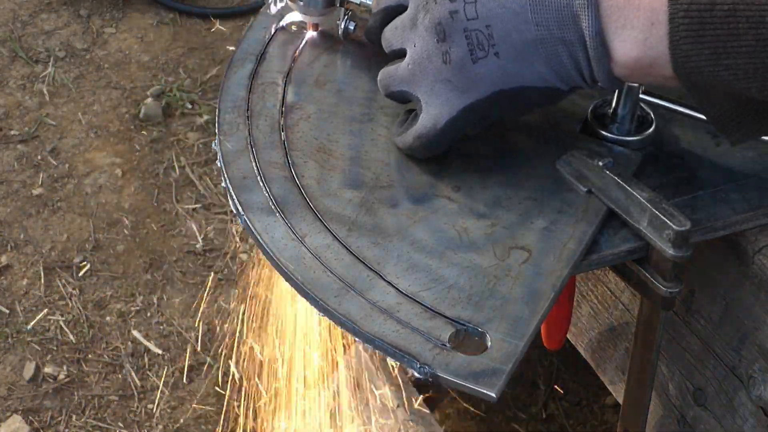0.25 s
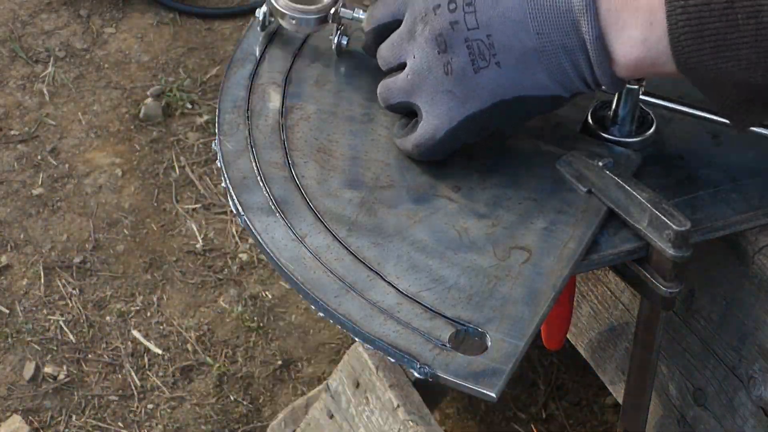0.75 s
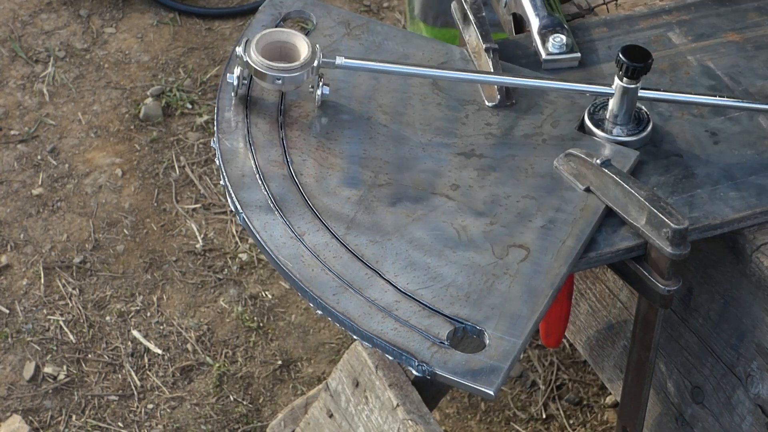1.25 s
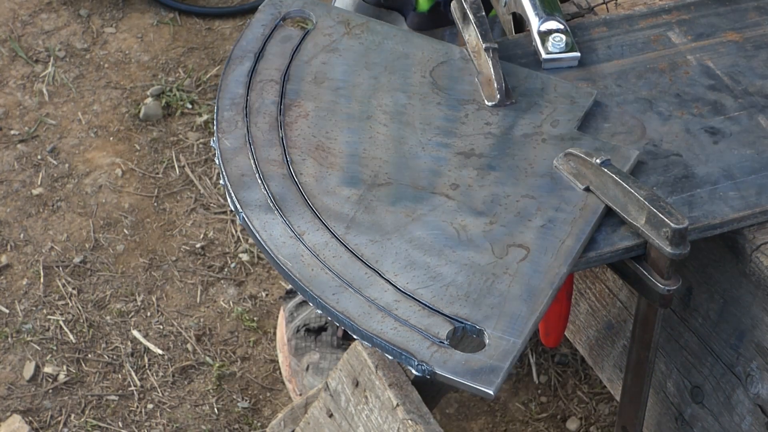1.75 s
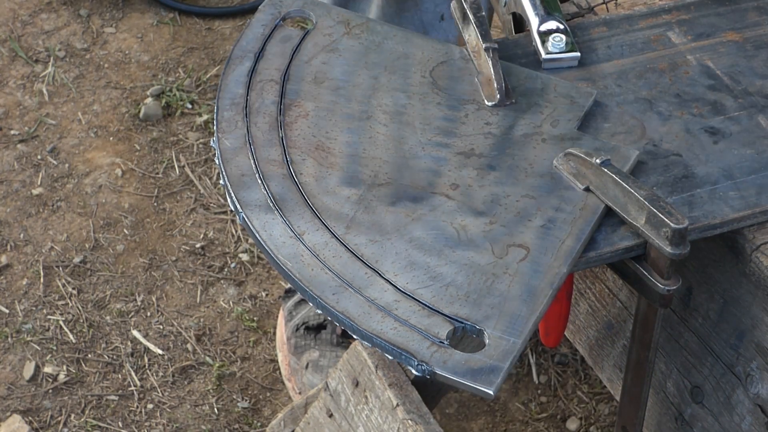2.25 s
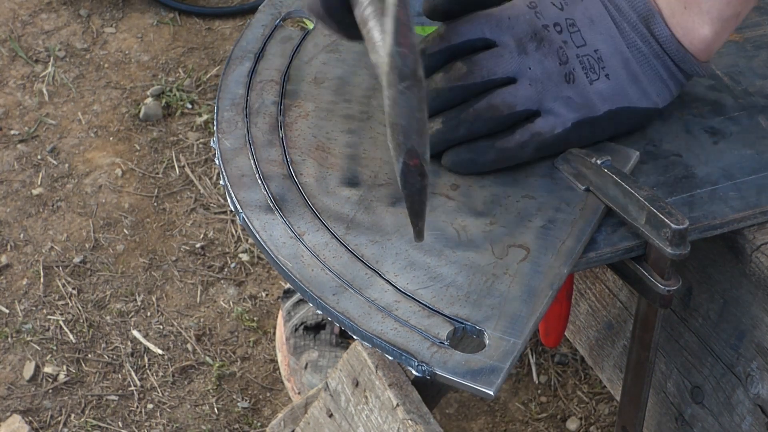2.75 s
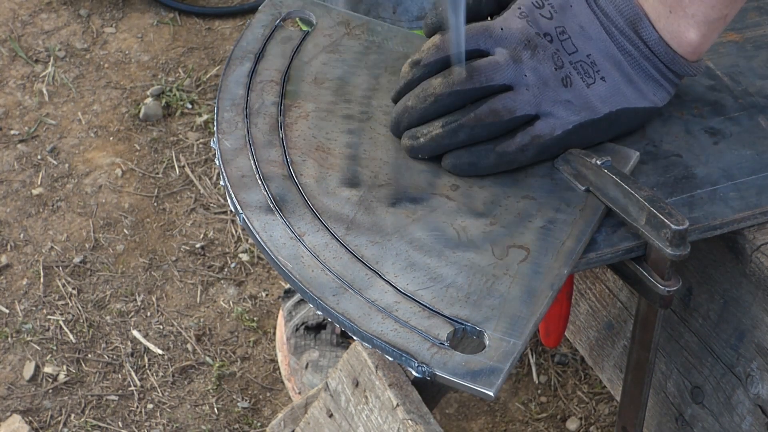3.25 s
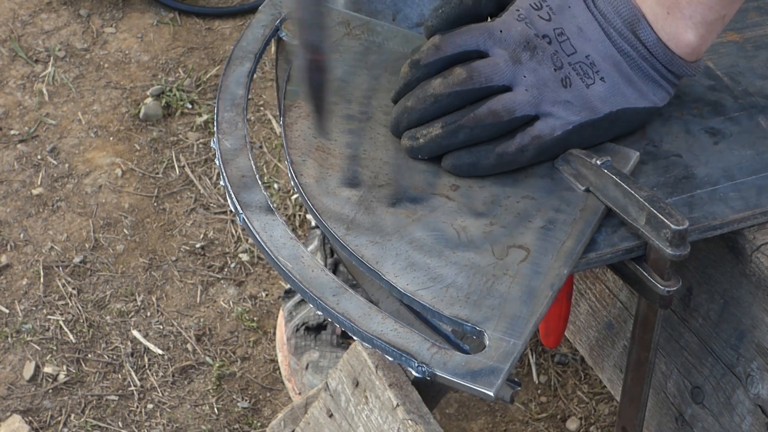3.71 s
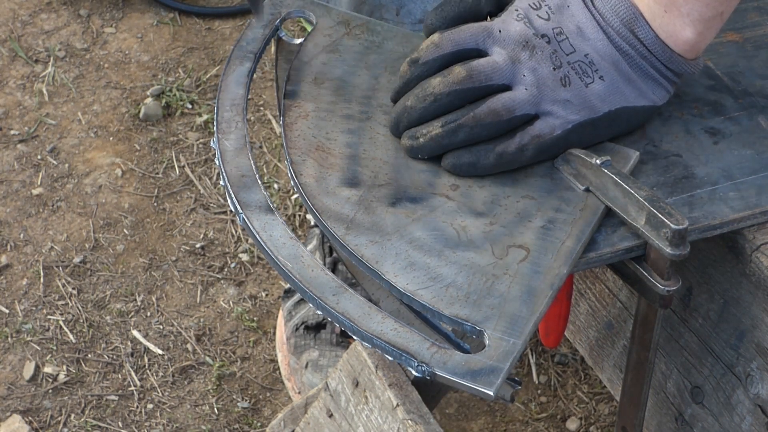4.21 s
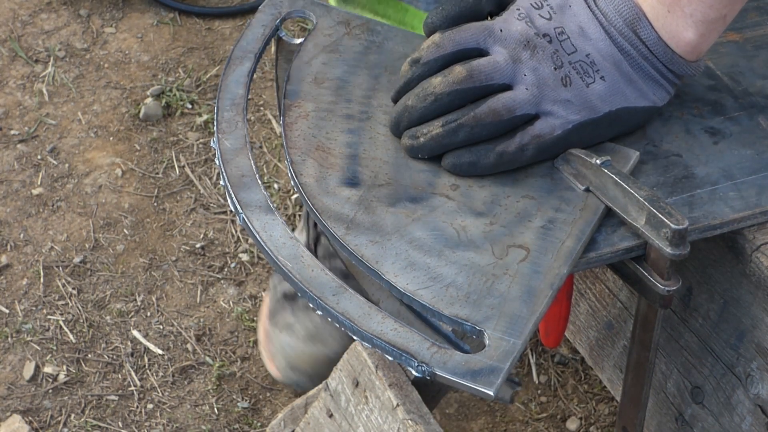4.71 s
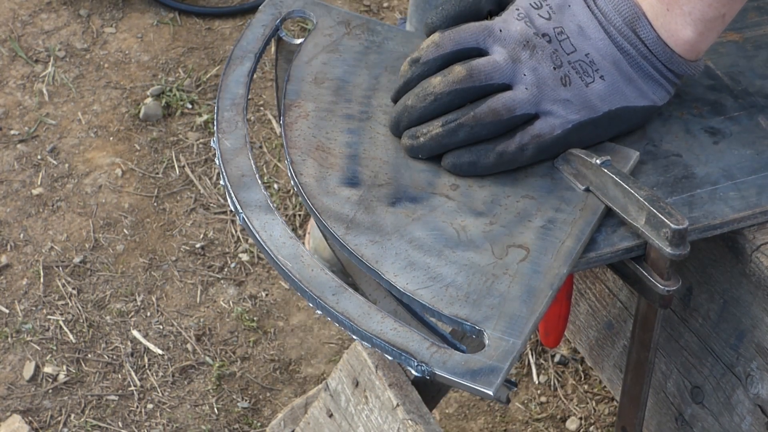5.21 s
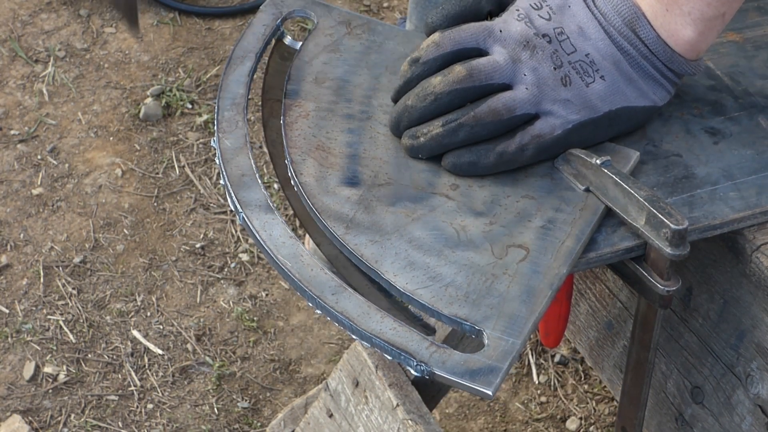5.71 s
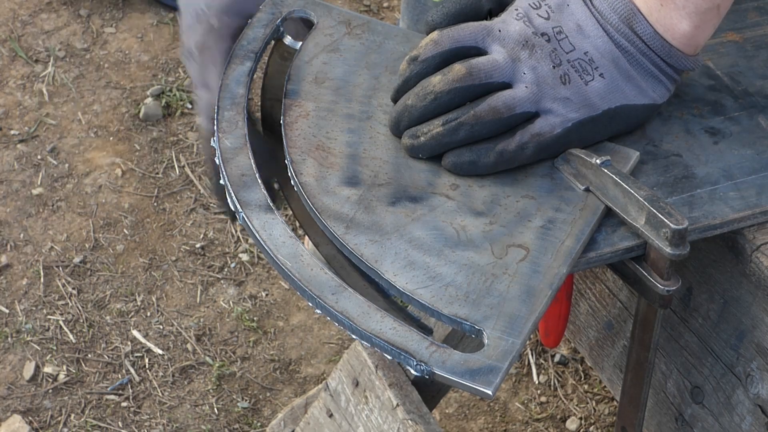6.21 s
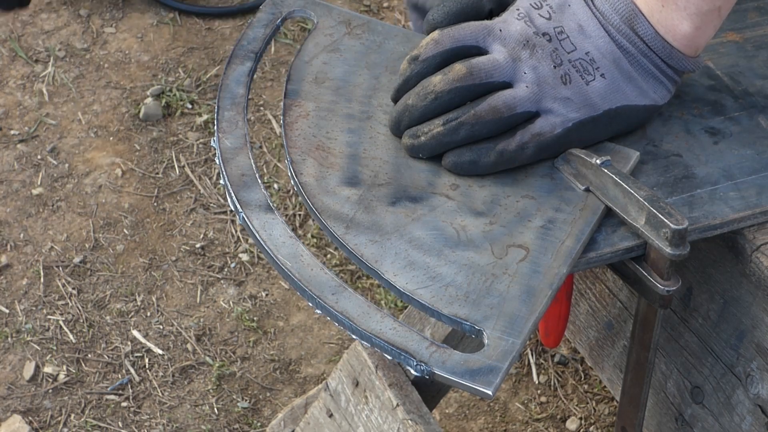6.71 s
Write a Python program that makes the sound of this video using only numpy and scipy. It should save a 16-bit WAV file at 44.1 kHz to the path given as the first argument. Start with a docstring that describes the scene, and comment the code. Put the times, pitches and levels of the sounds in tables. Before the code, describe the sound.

Outdoors, a fierce cutting hiss stops with spits and air puffs; a close compressor drones while a hammer knocks a steel strip loose.

```python
"""Outdoors, a plasma torch hisses through a steel plate, sputters out and blows off its cooling air.
After a short fade the piston air compressor is close and loud, chugging about 46 times a second, while a
chipping hammer knocks the cut strip loose; a bird chirps faintly, and hard blows make the gain control duck.
Jets, puffs and blows are filtered noise; the pump's tone is a sum of partials of its stroke rate; struck
steel is a set of decaying modes."""
import sys
import numpy as np
from scipy import signal
from scipy.fft import rfft, irfft
from scipy.io import wavfile
from scipy.ndimage import uniform_filter1d, minimum_filter1d

SR = 44100
rng = np.random.default_rng(int(sys.argv[2]) if len(sys.argv) > 2 else 0)


def output_pcm(signal):
    """Save a mono or channel-first signal as 16-bit PCM at the path in sys.argv[1].

    Samples are clipped to [-1, 1] before scaling.
    """
    pcm = np.clip(np.atleast_2d(signal).T, -1, 1) * 32767
    wavfile.write(sys.argv[1], SR, np.round(pcm).astype(np.int16))


N = 306936
TIME = np.arange(N) / SR
HZ = np.maximum(np.arange(N // 2 + 1) * SR / N, 1)
SIDES = np.array([[1], [-1]])   # left, right
STROKE_HZ = 45.8   # compressor strokes per second
ARC_OUT_S = .612
NEAR_FROM_S = 1.56   # the compressor is distant before this moment, close after it

# hammer blows and rebounds, with the two pitches that the struck spot favours:
# start_s, crack_db, crack_hz, ping_against_crack_db, ring_db, first_hz, second_hz
BLOWS = [(3.0075, -17, 1800, -24, -17, 2260, 1570), (3.02, -19, 1900, -24, -16.5, 1560, 2260),
         (3.4005, 3.5, 6700, -30, -8, 1570, 2340), (4.155, -20, 1800, -20, -23, 1400, 1810),
         (4.4855, -17, 2000, -30, -16, 2260, 2600), (4.498, -20, 1900, -28, -15, 1810, 2170),
         (4.7908, -14.5, 5800, -4, -19, 3270, 7600), (4.7918, -9, 1200, -22, -11, 1180, 1390),
         (4.796, -16, 2400, -22, -14, 1250, 2620), (5.0755, -16, 5800, -9, -22, 4850, 7600),
         (5.082, -9.5, 1900, -28, -10, 1810, 2420), (5.085, -16, 5000, -26, -10, 5710, 2170),
         (5.3633, -5.5, 6400, -7, -11, 1390, 5850), (5.37, -16, 2600, -22, -16, 1390, 2940),
         (5.4425, -17, 2920, -28, -20, 2940, 3270)]


def from_db(db):
    """Level and amplitude: 20 dB is a factor of ten."""
    return 10 ** (np.asarray(db) / 20)


def rms_one(x):
    """Normalisation: scale to unit mean power."""
    return x / np.sqrt(np.mean(x ** 2) + 1e-20)


def in_time(rows):
    """Linear interpolation: each column of a curve at every sample."""
    s, *columns = np.transpose(rows)
    return [np.interp(TIME, s, column) for column in columns]


def at_hz(points, hz):
    """Logarithmic pitch scale: interpolate a spectrum along log frequency."""
    f, value = np.transpose(points)
    return np.interp(np.log(hz), np.log(f), value)


def drift(corner_hz):
    """Random fluctuation: noise low-passed above the corner, with rms 1."""
    lowpass = 1 / (1 + (HZ / corner_hz) ** 2)
    return rms_one(irfft(rfft(rng.standard_normal(N)) * lowpass, N))


def colour(x, spectrum, resonances=()):
    """Source and filter: a broad spectrum with resonant humps or dips shapes a signal; rms 1."""
    db = at_hz(spectrum, HZ)
    for hz, width_hz, lift_db in resonances:
        db = db + lift_db / (1 + (2 * (HZ - hz) / width_hz) ** 2)
    return rms_one(irfft(rfft(x) * from_db(db), N))


def spread(pair):
    """Interaural coherence: mix two unrelated signals so that likeness depends on frequency."""
    # left-right likeness: pitch_hz, likeness
    likeness = [(30, 0.46), (100, 0.65), (300, 1), (600, 0.8), (1200, 0.68), (8000, 0.85), (14000, 0.6)]
    alike = np.clip(at_hz(likeness, HZ), 0, .999)
    mid, side = rfft(pair)
    return irfft(np.sqrt((1 + alike) / 2) * mid + np.sqrt((1 - alike) / 2) * side * SIDES, N)


def noise():
    """Turbulence as a random signal: white noise, partly alike in both ears."""
    return spread(rng.standard_normal((2, N)))


def burst(white, s, decay_s, hz, width):
    """Impulsive noise: a sudden, exponentially dying burst through a band from hz / width to hz * width."""
    band = signal.butter(2, [hz / width, min(hz * width, .45 * SR)], "band", fs=SR, output="sos")
    start, out = int(s * SR), np.zeros((2, N))
    part = white[:, start:start + SR // 3]
    dying = part * np.exp(-np.arange(part.shape[1]) / SR / decay_s)
    steady_rms = signal.sosfilt(band, part).std()
    out[:, start:start + SR // 3] = signal.sosfilt(band, dying) / steady_rms
    return out


def ring(clicks, hz, t60):
    """Damped resonator: a unit click sets a sine of height 1 ringing, 60 dB down after t60 seconds."""
    r, w = from_db(-60 / (t60 * SR)), 2 * np.pi * hz / SR
    return signal.lfilter([0, np.sin(w)], [1, -2 * r * np.cos(w), r * r], clicks + 1e-18)


def compressor(rumble_db=-11, buzz_db=-3.5, uneven_db=1.4, jitter_turns=0.00021, wobble_db=0.46, sputter_db=-11):
    """Periodic modulation: the turning crank paces the chug, the valves' hiss and the housing's rumble."""
    # rumble of the pump housing: pitch_hz, density_db (per Hz)
    rumble = [(25, -21), (60, -16), (120, -9), (200, -4), (320, -4), (620, 6), (900, -8.5), (3000, -65)]
    # hiss of the valves: pitch_hz, density_db (per Hz)
    pump_hiss = [(530, -28), (900, -10), (1120, -6), (1210, -10), (1560, -3.5), (1800, -7.5), (2890, -12.5),
                 (3300, -15.5), (4040, -10.5), (4440, -16.5), (7410, -12.3), (12500, -22.7), (15500, -40)]
    # resonances of the pump head and its pipes: pitch_hz, width_hz, lift_db
    pump_head = [(4075, 120, 6), (5400, 1200, 5), (7530, 120, 4), (10400, 90, 7), (11200, 590, -4)]
    # stereo balance: pitch_hz, left_minus_right_db
    balance = [(250, -1.2), (600, 1.6), (1200, 3.1), (2400, 3.6), (6000, 1.9), (15000, 2.3)]
    far_lag_turns = .15
    turn = STROKE_HZ * TIME + jitter_turns * drift(11) - far_lag_turns * (TIME < NEAR_FROM_S)
    chug_db, hiss_db = pump_levels()
    housing = colour(noise() * stroke(turn, peak_at=0.71, depth_db=-1.5), rumble)
    low = chug(turn) * from_db(wobble_db * drift(20)) + from_db(rumble_db) * housing
    puffs = stroke(turn, peak_at=0.75, depth_db=1.4) * from_db(uneven_db * drift(57))
    hiss = colour((noise() + from_db(buzz_db) * valve_buzz(turn)) * puffs, pump_hiss, pump_head)
    hiss = hiss + from_db(sputter_db) * sputter(turn)
    pump = from_db(chug_db) * low + from_db(hiss_db) * hiss
    pump = pump * (TIME > ARC_OUT_S)   # labouring_pump() sounds before that
    return irfft(rfft(pump) * from_db(SIDES * at_hz(balance, HZ) / 2), N)


def pump_levels():
    """Level and distance: far chug and hiss swell to a limit; the near hiss follows the chug in part."""
    # level of the close chug: start_s, level_db
    near_chug = [(1.58, -23), (1.85, -21.2), (2.8, -20.3), (4.5, -20.8), (5.5, -23.4), (6.1, -22),
                 (6.9, -21.6)]
    far_db, far_start_db, far_swell_s, far_hiss_db = -29, -22, .66, -5.5   # start and hiss are relative
    hiss_base_db, follow_share, rise_db_per_s = -25.6, .5, .3
    far = far_db + far_start_db * np.exp(-TIME / far_swell_s)
    near, = in_time(near_chug)
    hiss = hiss_base_db + follow_share * (near - near.mean()) + rise_db_per_s * (TIME - NEAR_FROM_S)
    return np.where(TIME < NEAR_FROM_S, [far, far + far_hiss_db], [near, hiss])


def stroke(turn, peak_at, depth_db):
    """Amplitude modulation: a valve is open for half of each crank turn; negative depth inverts the swell."""
    return from_db(depth_db * np.tanh(2 * np.cos(2 * np.pi * (turn - peak_at))))


def chug(turn, ear_radians=.014, waver_db=.8, size=1024, count=30):
    """Fourier series: the phases of low, middle and high partials are set to give one puff per stroke."""
    # partials of the chug: multiple_of_stroke_rate, level_db
    pump_orders = [(2, -19.5), (3, -15), (5, -5.5), (7, -12), (8, 2.5), (9, -1.5), (10, -7), (11, -13),
                   (12, 4), (14, -1), (15, -1.5), (16, -6), (18, -9), (21, -12), (22, -9), (24, -3.8),
                   (25, -8), (27, -15.5), (31, -14.5), (33, -13.5), (34, -13.5)]
    # growth of the rising partial: start_s, lift_db
    rise = [(4.7, 0), (6.2, 6)]
    rising_order = 22
    orders, db = np.transpose(pump_orders)
    cycle, orders, heights = np.arange(size) / size, np.round(orders), from_db(db)
    waves = np.exp(2j * np.pi * np.outer(cycle, orders))
    partials = heights * np.exp(2j * np.pi * rng.random(len(orders)))
    swell = stroke(cycle, peak_at=.65, depth_db=4.2)
    # impose the swell, then the heights, by turns: only the phases are left to settle
    for group in np.split(np.arange(len(orders)), [7, 13]):
        for _ in range(count):
            even = swell * np.exp(1j * np.angle(waves[:, group] @ partials[group]))
            partials[group] = heights[group] * np.exp(1j * np.angle(even @ waves[:, group].conj()))
    # reflections bring each partial to one ear a little before the other
    leads = SIDES * ear_radians * orders * rng.choice([-1, 1], len(orders))
    out, rise_db = 0, in_time(rise)[0]
    for k, partial, lead in zip(orders, partials, leads.T):
        gain = abs(partial) * from_db(waver_db * drift(2) + rise_db * (k == rising_order))
        out = out + gain * np.cos(2 * np.pi * k * turn + np.angle(partial) + lead[:, None])
    return rms_one(out)


def valve_buzz(turn, size=960):
    """Periodic noise: the valves' clatter is one random pattern repeated with every crank turn."""
    cycle = np.arange(size) / size
    return spread([np.interp(turn, cycle, rng.standard_normal(size), period=1) for _ in range(2)])


def sputter(turn, opens_at=.47, decay_s=.008, uneven_db=5):
    """Pulsed turbulence: each stroke spits a short, bright puff of air of random strength."""
    # spectrum of the puffs: pitch_hz, density_db (per Hz)
    puff_colour = [(3000, -24), (6000, 0), (9500, -1), (15500, -26)]
    number, part = np.divmod(turn - opens_at, 1)
    number = (number - number.min()).astype(int)
    strength = from_db(uneven_db * np.minimum(rng.standard_normal(number.max() + 1), 2))
    dying = np.exp(-part / STROKE_HZ / decay_s)
    return rms_one(strength[number] * dying * colour(noise(), puff_colour))


def hammer(crack_width=1.68, thud_hz=620, thud_width=2.28, thud_s=0.034, yard_db=-15, yard_s=0.039, yard_hz=1750):
    """Impact and reflection: each blow cracks in the cut, shakes the bench and scatters round the yard."""
    body_max_db = -2.5   # harder blows only sharpen the crack; bench and yard answer no louder
    crack_s, crack_cycles = .001, 16   # decay: this time plus so many cycles of the crack's centre
    echo_db, echo_s, ground_delay_s = -18, .02, .009   # the crack comes back from the ground, smeared
    # sharper blows shake the bench less
    thud_base_db, thud_reference_hz, thud_db_per_octave = -2.5, 1700, -5
    out, near, far = np.zeros((2, N)), noise(), noise()
    for s, db, hz, *_ in BLOWS:
        body_db = min(db, body_max_db)
        thud_db = thud_base_db + thud_db_per_octave * np.log2(hz / thud_reference_hz)
        out += from_db(db) * burst(near, s, crack_s + crack_cycles / hz, hz, crack_width)
        out += from_db(db + echo_db) * burst(far, s + ground_delay_s, echo_s, hz, crack_width)
        out += from_db(body_db + thud_db) * burst(near, s + 0.00188, thud_s, thud_hz, thud_width)
        out += from_db(body_db + yard_db) * burst(far, s + ground_delay_s, yard_s, yard_hz, 1.5)
    return out


def ringing_steel():
    """Modal vibration: each blow excites the natural modes of the plate and of the hammer head."""
    # modes of the steel plate and its half-freed strip: pitch_hz, level_db, t60_s
    plate_modes = [(1130, -2, .08), (1235, -1, .06), (1390, 0, .15), (1570, -2, .11), (1810, 0, .1),
                   (2170, 0, .08), (2280, -2, .08), (2440, -1, .08), (2620, -3, .09), (2940, -3, .09),
                   (3270, -4, .06), (4850, 2, .03), (5670, 3, .025), (5880, 1, .02), (7600, 1, .03)]
    # pinging modes of the hammer head: pitch_hz, level_db, t60_s
    head_modes = [(9085, -4, .16), (9600, 0, .018)]
    dull_db_per_octave = -7   # a blow hardly stirs the modes above the centre of its crack
    s, db, crack_hz, ping_db, ring_db, first_hz, second_hz = np.transpose(BLOWS)
    out = np.zeros((2, N))
    for hz, mode_db, t60 in plate_modes:
        dull_db = dull_db_per_octave * np.maximum(np.log2(hz / crack_hz), 0)
        out += strike(hz, t60, s, ring_db + mode_db + favour(hz, first_hz, second_hz) + dull_db)
    for hz, mode_db, t60 in head_modes:
        out += strike(hz, t60, s, db + ping_db + mode_db)
    return out


def strike(hz, t60, s, db):
    """Impulse excitation: every blow clicks a mode with random sign and a strength of its own at each ear."""
    clicks = np.zeros((2, N))
    chance_db = rng.normal(0, 1.5, (len(s), 2)).T
    clicks[:, (s * SR).astype(int)] = rng.choice([-1, 1], len(s)) * from_db(db + chance_db)
    return ring(clicks, hz, t60)


def favour(hz, first_hz, second_hz, reach_octaves=.1, off_spot_db=-10):
    """Dependence on striking point: a mode is full near either favoured pitch, weaker away from both."""
    octaves = np.minimum(np.abs(np.log2(hz / first_hz)), np.abs(np.log2(hz / second_hz)))
    return off_spot_db * (1 - np.exp(-(octaves / reach_octaves) ** 2))


def loose_strip(landing_width=1.5):
    """Free vibration and impact: the freed strip tinkles at its modes and lands with two dull bumps."""
    # the strip drops to the ground: start_s, level_db
    landings = [(6.431, -28), (6.556, -28.5)]
    # tinkling modes: start_s, pitch_hz, level_db, t60_s
    tinkles = [(6.29, 12830, -39, .7), (6.29, 5039, -35.5, 1.1), (6.42, 5660, -26, .3),
               (6.47, 5039, -34.5, .7), (6.49, 5670, -32, .6)]
    white, out = noise(), np.zeros((2, N))
    for s, db in landings:
        out += from_db(db) * burst(white, s, .026, 260, landing_width)   # decay in s, centre in Hz
    for s, hz, db, t60 in tinkles:
        out += from_db(db) * ring(signal.unit_impulse(N, int(s * SR)), hz, t60)
    return out


def torch():
    """Superposition: the cutting jet, the labouring pump, the last spits and the cooling air add up."""
    burning = np.clip((ARC_OUT_S - TIME) / 0.0018, 0, 1)
    return cutting_jet(burning) + burning * labouring_pump() + last_spits() + cooling_air()


def cutting_jet(burning, flutter_db=0.5):
    """Jet noise and resonance: turbulence hisses in the kerf, softer once only plain air blows there."""
    # level of the jet: start_s, level_db
    arc = [(0, -18.5), (.03, -22.3), (.088, -23.5), (.112, -19.7), (.2, -19.4), (.3, -22.8), (.43, -19.2),
           (.465, -22), (.58, -18.3)]
    # spectrum of the jet: pitch_hz, density_db (per Hz)
    arc_colour = [(80, -33), (130, -25), (280, -15.5), (750, -13.5), (1000, -17), (1600, -8.5),
                  (2500, -11.3), (3400, -13.5), (5000, -9.5), (9500, -6), (12500, -10), (15800, -19)]
    # resonances of the jet in the kerf: pitch_hz, width_hz, lift_db
    kerf = [(990, 80, -8), (1590, 240, 5.5), (4020, 84, 9), (8160, 210, 4.5), (9500, 540, 3.5)]
    kerf_air_db, lift_s, lift_fade_s = -12, .83, .06   # air against burning jet; the torch lifts away
    roar_band_hz, roar_start_db, roar_db_per_s = (1200, 5000), -3, 7.5
    jet = from_db(in_time(arc)[0] + flutter_db * drift(60)) * colour(noise(), arc_colour, kerf)
    # the midrange grows towards the end of the cut
    band = signal.butter(2, roar_band_hz, "band", fs=SR, output="sos")
    roar_db = roar_start_db + roar_db_per_s * np.minimum(TIME, ARC_OUT_S)
    jet = jet + signal.sosfiltfilt(band, jet) * (from_db(roar_db) - 1)
    in_kerf = from_db(kerf_air_db) * (1 - np.tanh((TIME - lift_s) / lift_fade_s / 2)) / 2
    return np.maximum(burning, in_kerf) * jet


def labouring_pump():
    """Beating: under the arc's load the pump runs slow, and neighbouring partials make its drone throb."""
    # course of the load: start_s, stroke_rate_hz, level_db
    labour = [(0, 42.8, -36), (.14, 43, -37.5), (.28, 41.1, -41), (.4, 41.9, -40.5), (.6, 42.4, -40)]
    # partials of the drone: multiple_of_stroke_rate, level_db
    labour_orders = [(3, -14), (5, -14), (8, -11), (12, -10), (13, 0), (14, -8), (26, -10)]
    rate, level_db = in_time(labour)
    phase = 2 * np.pi * np.cumsum(rate + drift(20) / 10) / SR
    drone = sum(from_db(db) * np.cos(round(k) * phase) for k, db in labour_orders)
    return np.sqrt(2) * from_db(level_db + drift(20)) * drone


def last_spits(spit_width=2.56):
    """Transient noise: the dying arc spits in short band-limited bursts."""
    # spits: start_s, level_db, decay_s, pitch_hz
    spit_rows = [(.6095, -21, .004, 1400), (.6195, -14.5, .007, 5500), (.6195, -24, .012, 1100),
                 (.632, -21, .004, 1600), (.632, -28, .006, 500)]
    white = noise()
    return sum(from_db(db) * burst(white, s, decay_s, hz, spit_width) for s, db, decay_s, hz in spit_rows)


def cooling_air():
    """Flow noise: hiss follows a steady flow; each surge swells quickly and dies exponentially."""
    # surges above the steady flow: peak_s, peak_level_db, decay_s
    surge_rows = [(.626, -26, .008), (.697, -28, .045), (.795, -21.6, .038)]
    # spectrum of the air: pitch_hz, density_db (per Hz)
    air_colour = [(880, -17), (1500, -12), (3100, -15), (4000, -11), (6700, -6.7), (10800, -3),
                  (15800, -14.5)]
    steady_db, steady_from_s, rise_s = -28.5, .68, .012
    steady = from_db(steady_db) * np.clip((TIME - steady_from_s) / rise_s, 0, 1)
    surges = 0
    for s, db, decay_s in surge_rows:
        surges = surges + from_db(db) * np.exp(-np.maximum((s - TIME) / rise_s, (TIME - s) / decay_s))
    flow = np.hypot(steady, surges) * (TIME < NEAR_FROM_S)
    return flow * from_db(1.2 * drift(20)) * colour(noise(), air_colour)


def bird(level_db=-31):
    """Frequency modulation: a small bird slurs a few thin notes, each a gliding sine."""
    # notes: start_s, length_s, first_pitch_hz, last_pitch_hz
    chirps = [(2.435, .035, 4800, 6000), (2.515, .022, 6200, 4800), (2.65, .045, 4400, 5900)]
    out = np.zeros(N)
    for s, length_s, first_hz, last_hz in chirps:
        start, pitch = int(s * SR), np.linspace(first_hz, last_hz, int(length_s * SR))
        note = np.sin(2 * np.pi * np.cumsum(pitch) / SR)
        out[start:start + len(pitch)] += np.sqrt(np.hanning(len(pitch))) * note
    return from_db(level_db) * out


def breeze(level_db=-66):
    """Low-frequency turbulence: a faint outdoor rumble of steeply falling noise."""
    # spectrum of the rumble: pitch_hz, density_db (per Hz)
    breeze_colour = [(25, 0), (400, -45)]
    return from_db(level_db) * colour(noise(), breeze_colour)


def scene():
    """Superposition: compressor, hammer, steel, torch, bird and breeze in the open air."""
    return compressor() + hammer() + ringing_steel() + loose_strip() + torch() + bird() + breeze()


def gain_control(x, threshold_db=-13.2, hold_s=0.063, release_s=0.094, attack_s=0.0038, size=180):
    """Dynamic compression: level above the threshold pulls the gain down; it holds, then creeps back."""
    level_db = 10 * np.log10(np.abs(uniform_filter1d(np.mean(x ** 2, axis=0), size)) + 1e-12)
    hold = 2 * int(hold_s * SR / 2) + 1
    over_db = -minimum_filter1d(-np.maximum(level_db - threshold_db, 1e-6), hold, origin=hold // 2)
    # exponential release: a running maximum against a falling slope
    over_db = np.exp(np.maximum.accumulate(np.log(over_db) + TIME / release_s) - TIME / release_s)
    r = np.exp(-1 / (attack_s * SR))
    return x * from_db(-signal.lfilter([1 - r], [1, -r], over_db))


def fades():
    """Amplitude envelope: gain ramps down into each gap and up out of it."""
    # short gaps in all sound: middle_s
    gaps = [1.562, 6.934]
    gap_s, fade_s, gap_db = .021, .027, -33   # length of a gap, of the ramps beside it, gain inside
    away = np.min([np.abs(TIME - s) for s in gaps], axis=0) - gap_s / 2
    return np.clip(away / fade_s, from_db(gap_db), 1)


def record(dry):
    """Nonlinear and linear transmission: gain control, rounded peaks, fades and a steep top cut."""
    wet = gain_control(dry)
    wet = .95 * wet / (1 + wet ** 4) ** (1 / 4) * fades()
    top_cut = signal.ellip(10, .1, 80, 16000, fs=SR, output="sos")   # cutoff in Hz
    return signal.sosfilt(top_cut, wet)


dry = scene()
out = record(dry)
output_pcm(out)
```